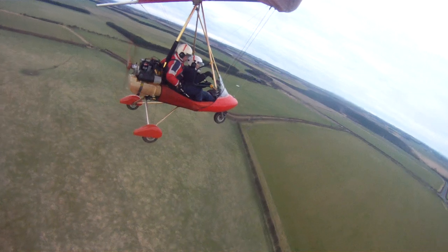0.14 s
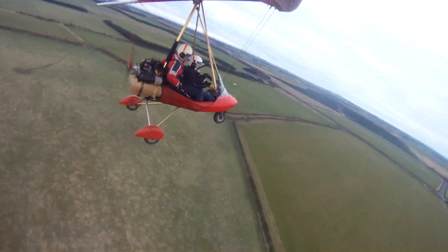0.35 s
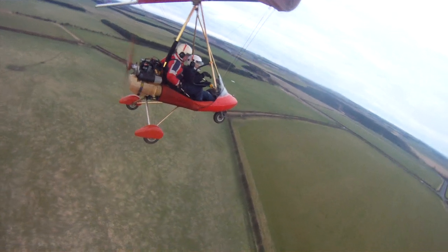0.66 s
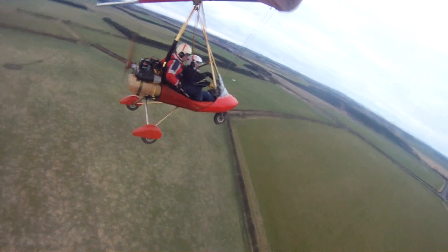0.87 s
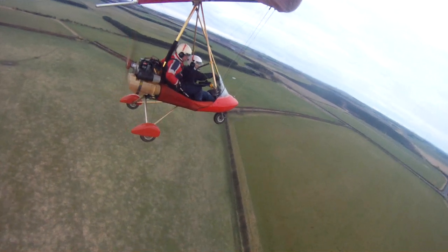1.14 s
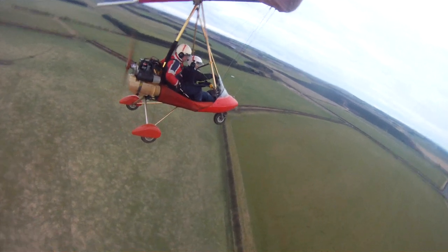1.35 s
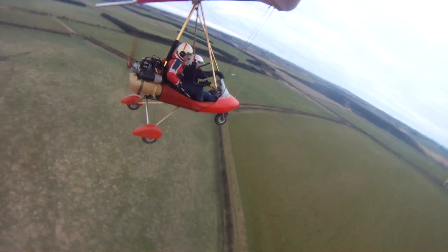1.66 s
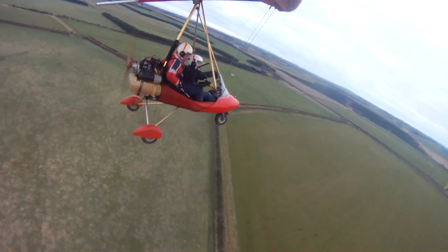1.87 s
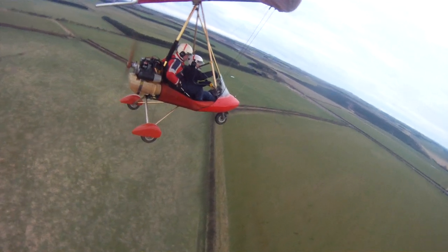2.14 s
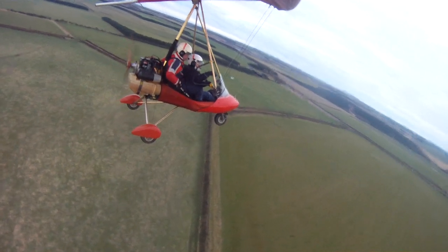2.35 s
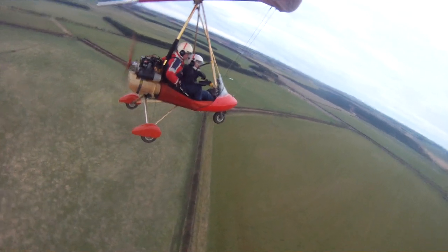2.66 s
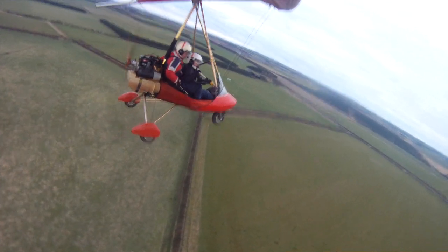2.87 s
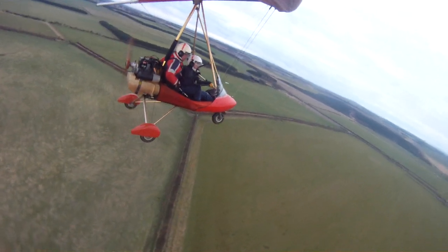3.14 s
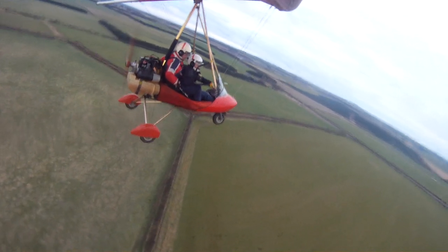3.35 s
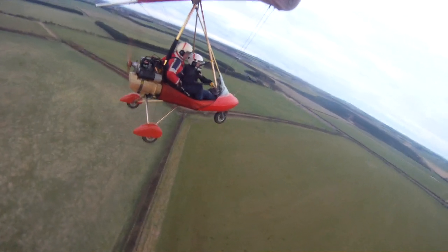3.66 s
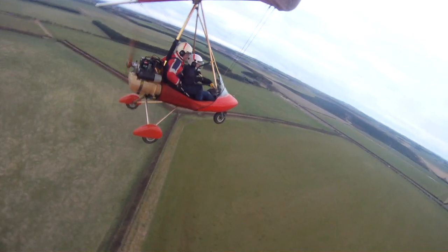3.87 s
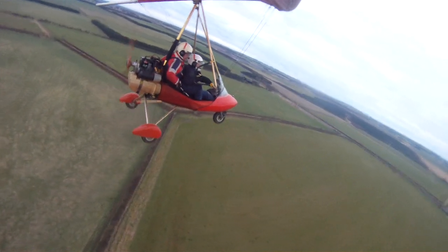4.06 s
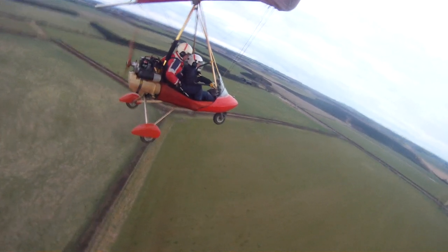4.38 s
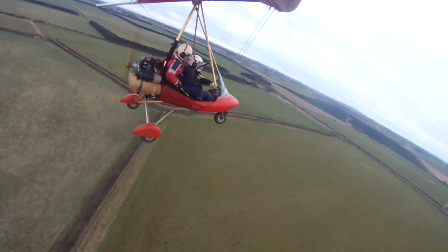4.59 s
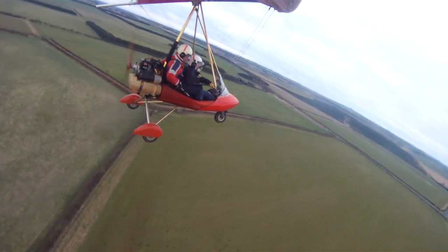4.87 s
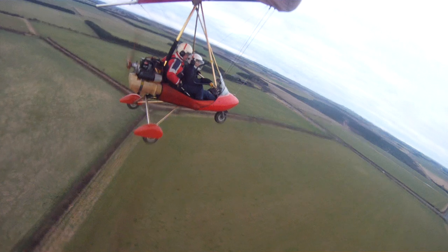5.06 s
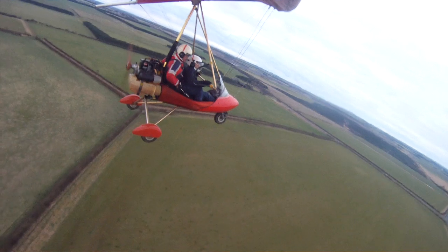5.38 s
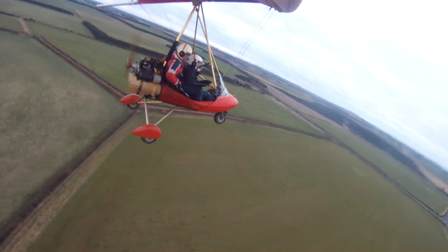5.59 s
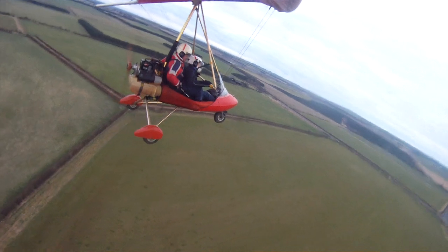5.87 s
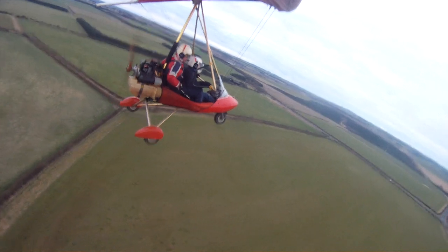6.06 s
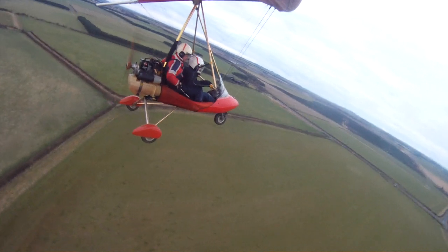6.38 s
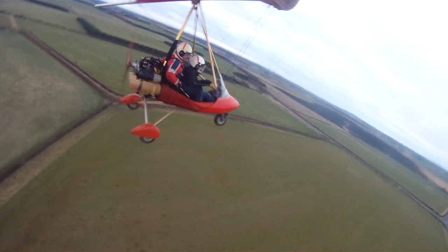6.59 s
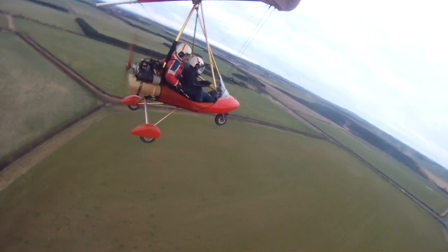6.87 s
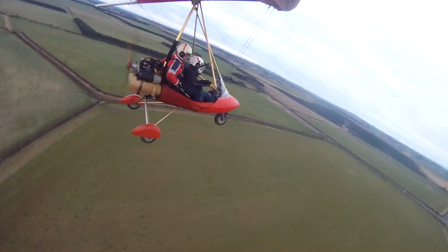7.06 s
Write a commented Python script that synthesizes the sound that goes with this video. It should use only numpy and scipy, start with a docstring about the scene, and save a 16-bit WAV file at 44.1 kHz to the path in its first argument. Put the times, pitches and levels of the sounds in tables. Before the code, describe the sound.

Gusting wind booms and rushes inside a small camera housing on a microlight's wing, with a deep throb, dull knocks and a faint engine drone.

```python
"""Air rushes and booms in quick gusts through a small closed housing clamped on a microlight's wing.
Filtered noise makes the rush, howl and hiss in the shell, and the boom and rumble in the wing tube.
The mount throbs as two low swings beat together; it knocks as short bursts of ringing modes.
Engine and pusher propeller add faint, slightly wavering tones, and the blades flutter the air noise."""
import sys
import numpy as np
from scipy import signal
from scipy.fft import rfft, irfft, next_fast_len
from scipy.io import wavfile
from scipy.ndimage import uniform_filter1d

SR = 44100
rng = np.random.default_rng(int(sys.argv[2]) if len(sys.argv) > 2 else 0)


def waveform_to_disk(signal):
    """Save audio, clipped to [-1, 1], as 16-bit WAV at the path in sys.argv[1]."""
    frames = np.transpose(np.atleast_2d(signal))
    scaled = np.clip(frames, -1, 1) * 32767
    samples = np.round(scaled).astype(np.int16)
    wavfile.write(sys.argv[1], SR, samples)


N = 318843
TIME = np.arange(N) / SR  # s
BINS = np.maximum(np.arange(N // 2 + 1) * SR / N, 1)  # Hz, kept above zero for the logarithm


def from_db(db):
    """Decibels to gain."""
    return 10 ** (np.asarray(db) / 20)


def rms_one(x):
    """Scale to rms 1."""
    return x / np.sqrt(np.mean(x ** 2) + 1e-20)


def drift(rate_hz, step_count=8):
    """Random wandering of rms 1, up to about rate_hz changes a second, drawn every step_count samples."""
    size = next_fast_len(N // step_count + 2)
    hz = np.arange(size // 2 + 1) * SR / (size * step_count)
    spectrum = rfft(rng.standard_normal(size)) / (1 + (hz / rate_hz) ** 2)
    slow = rms_one(irfft(spectrum, size))
    return np.interp(np.arange(N) / step_count, np.arange(size), slow)


def turning(hz):
    """Phase of something that turns at the given speed, from a random starting angle."""
    turns = np.cumsum(hz * np.ones(N)) / SR
    return 2 * np.pi * (turns + rng.random())


def below(edge_hz, order=8):
    """Share of each frequency's power that lies under a soft edge."""
    return 1 / (1 + (BINS / edge_hz) ** (2 * order))


def response(modes, floor):
    """Power response of a body: steep resonances standing on a smooth floor."""
    floor_hz, floor_db = np.transpose(floor)
    power = from_db(np.interp(np.log(BINS), np.log(floor_hz), floor_db)) ** 2
    for centre_hz, width_hz, db in modes:
        detuning = 2 * (BINS - centre_hz) / width_hz
        power = power + (from_db(db) / (1 + detuning ** 2)) ** 2
    return power


def turbulence(power, flutter_db, steady_s):
    """Fluttering air pressure heard through a body; its slow level is held near rms 1."""
    pressure = rng.standard_normal(N) * from_db(flutter_db)
    sound = irfft(rfft(pressure) * np.sqrt(power), N)
    size = max(int(steady_s * SR), 2)
    slow_power = uniform_filter1d(uniform_filter1d(sound ** 2, size), size)
    return sound / np.sqrt(slow_power + 1e-20)


def gusts():
    """Rise of rush, boom and rumble in dB: each gust swells, holds and drops away."""
    # gusts that hit the housing: start of hold_s, hold_s, rush_rise_db, boom_rise_db, rumble_rise_db
    gust_rows = [(0.034, 0.1, 3.5, 4, 2), (0.282, 0.057, 4.5, 6, 3), (0.438, 0.042, 3.5, 5, 4.5),
                 (0.584, 0.2, 3.5, 4.3, 2.3), (0.937, 0.12, 2.5, 2, 6.5), (1.26, 0.2, 4.7, 6.5, 5.5),
                 (1.63, 0.0, 5, 4, 6), (1.693, 0.15, 2.5, 1, 0), (1.915, 0.181, 4, 6.5, 1),
                 (2.198, 0.18, 5.8, 3.5, 4), (2.417, 0.17, 1.3, 5, 0.5), (2.673, 0.13, 1.3, 4.5, 0.4),
                 (2.88, 0.041, 5, 7, 5.0), (3.026, 0, 3.5, 8.5, 1.3), (3.2, 0.084, 3.5, 5.5, 0),
                 (3.395, 0.041, 5.5, 5, 6.5), (3.572, 0.042, 2.5, 7.5, 4.7), (3.696, 0.049, 3.5, 1, 3.5),
                 (3.926, 0, 3.5, 6, 5), (4.071, 0.066, 4, 6.5, 4.5), (4.278, 0.0, 3.5, 3.5, 7.5),
                 (4.398, 0.063, 3, -0.5, 4), (4.535, 0.091, 4.1, 7, 1.8), (4.713, 0.12, 4, 7, 3.4),
                 (4.978, 0.064, 3.5, 8.5, 2), (5.238, 0.006, 4, 8.5, 1), (5.368, 0.016, 3.5, 6, -2),
                 (5.629, 0.13, 5.3, 8, 2.5), (6.046, 0.11, 5.4, 4.5, 4.5), (6.337, 0.0, 3.5, 3.5, 6.5),
                 (6.45, 0.15, 5.5, 6, 3.5), (6.76, 0.06, 0.3, 0.5, 5), (6.852, 0.11, 3, 5.5, 1),
                 (7.018, 0.16, 4.4, 4, 5)]
    attack_s, release_s = 0.074, 0.031
    rise_db = np.zeros((3, N))
    for s, hold_s, *db in gust_rows:
        end_s = s + abs(hold_s)
        corners = [s - attack_s, s, end_s, end_s + release_s]
        rise_db += np.outer(db, np.interp(TIME, corners, [0, 1, 1, 0]))
    return rise_db


def beat_phase(lead_s=0):
    """Angle between the mount's two swings, lead_s ahead; at zero they add up."""
    # how fast the slower swing falls behind the faster: time_s, beat_rate_hz
    beat_curve = [(0.0, 5.03), (0.43, 3.87), (0.85, 7.09), (1.28, 5.34), (1.7, 5.66), (2.13, 5.25),
                  (2.55, 5.91), (2.98, 5.47), (3.4, 5.97), (3.83, 4.74), (4.25, 6.74), (4.68, 4.82),
                  (5.1, 5.3), (5.53, 5.47), (5.95, 5.0), (6.38, 5.56), (6.8, 5.77), (7.23, 5.84)]
    first_turns = .158
    s, rate_hz = np.transpose(beat_curve)
    rate_hz = np.interp(TIME, s, rate_hz)
    return 2 * np.pi * (first_turns + np.cumsum(rate_hz) / SR + rate_hz * lead_s)


def propeller():
    """Phase of the blade passes: two blades per turn, at a speed that wanders slightly."""
    turn_hz = 36.25
    return turning(2 * turn_hz * (1 + .002 * drift(1)))


def engine(blade_phase, blade_db=-43, waver_db=1.0):
    """Low engine orders and the blade tone, carried by the airframe as sines."""
    # engine tones: multiple of crank speed, level_db (rms, before the waver)
    engine_orders = [(.25, -30), (.5, -28.5), (2, -38.5), (2.25, -31.5)]
    crank_hz = 83.2
    crank = turning(crank_hz * (1 + .0015 * drift(1)))
    tones = from_db(blade_db) * np.sin(blade_phase)
    for order, db in engine_orders:
        tones = tones + from_db(db + waver_db * drift(1)) * np.sin(order * crank)
    return np.sqrt(2) * tones  # a sine's rms to its peak


def shake(unrest_hz=1.55, unrest_db=2.26):
    """The mount's two uneven swings on the wing tube beat against each other: a deep throb."""
    swing_hz = 34.7  # mean rate of the faster swing
    fast_db, slow_db = -20.5, -25  # rms, before the unrest
    fast_phase = turning(swing_hz + unrest_hz * drift(16))
    slow_phase = fast_phase - beat_phase()
    fast = from_db(fast_db + unrest_db * drift(16)) * np.sin(fast_phase)
    slow = from_db(slow_db + unrest_db * drift(16)) * np.sin(slow_phase)
    return np.sqrt(2) * (fast + slow)


def hard_knocks():
    """Timed heavy contacts in the mount."""
    # blows before the overall knock trim and mode levels: start_s, level_db
    blow_rows = [(0.0841, -15), (0.123, -18), (0.3202, -19), (0.5342, -20), (0.567, -15), (0.6424, -17),
                 (0.7521, -17), (0.8999, -19), (1.466, -18), (1.6326, -15), (1.6969, -20), (1.7539, -17),
                 (1.7993, -18), (1.9613, -14), (2.0546, -16), (2.096, -19), (2.2168, -16), (2.7401, -19),
                 (2.9032, -14), (4.5255, -18), (4.7241, -16), (4.7939, -14), (5.2993, -17), (5.626, -18),
                 (6.0495, -16), (6.0831, -17), (6.1533, -15), (6.318, -17), (6.952, -15), (7.0922, -12),
                 (7.167, -15)]
    return blow_rows


def taps(rise_db):
    """Light blows at random moments, harder in gusts: rows of start_s, level_db before the knock trim."""
    taps_per_s, between_gusts_db, spread_db = 2.0, -27, 1.0
    happens = rng.random(N) < taps_per_s / SR
    level_db = between_gusts_db + rise_db + spread_db * rng.standard_normal(N)
    return np.column_stack([TIME[happens], level_db[happens]])


def knocks(blows, trim_db=-3.2, scatter_db=2.0):
    """Soft contacts in the mount: each mode swells for a few cycles and dies."""
    # what a knock rings with: pitch_hz, width_hz (wider dies sooner), level_db (relative)
    knock_modes = [(720, 120, -14), (1100, 140, -6), (1240, 130, 0), (1620, 200, -11)]
    out = np.zeros(N + SR)
    t = TIME[:SR // 20]
    hz, width_hz, mode_db = np.transpose(knock_modes)[:, :, None]
    age = np.pi * width_hz * t
    swell = age * np.exp(1 - age)  # peaks at 1
    for s, db in blows:
        strength = from_db(db + trim_db + mode_db + scatter_db * rng.standard_normal(hz.shape))
        rings = strength * swell * np.sin(2 * np.pi * (hz * t + rng.random(hz.shape)))
        start = max(int(s * SR), 0)
        out[start:start + len(t)] += rings.sum(axis=0)
    return out[:N]


def buffeting(boom_rise_db, rumble_rise_db, boom_unrest_db=1.5, rumble_unrest_db=1.16):
    """Large eddies push on the wing tube and its clamp: noise through the frame's resonances."""
    # wing tube and clamp: pitch_hz, width_hz, level_db (relative)
    frame_modes = [(99.3, 24, 11.5), (140, 32, 4.5), (188, 20, 2.5), (213.3, 32, 4.5), (239.9, 18, 10.5)]
    # between those resonances: pitch_hz, density_db (relative, per Hz)
    frame_floor = [(20, -6), (44, 12.5), (60, 7.5), (80, -1.5), (130, -1), (200, 4), (260, -35), (290, -47),
                   (330, -30), (450, -24), (900, -88)]
    boom_base_db, rumble_base_db = -27, -25  # between gusts
    pulse_db, lead_s = 1.0, 0.045  # the boom pulses with the beat, peaking ahead of the throb
    frame = response(frame_modes, frame_floor)
    low = below(169.5)
    rumble_db = rumble_base_db + rumble_rise_db + rumble_unrest_db * drift(12)
    boom_db = boom_base_db + boom_rise_db + boom_unrest_db * drift(17.6)
    boom_db = boom_db + pulse_db * np.cos(beat_phase(lead_s))
    rumble = from_db(rumble_db) * turbulence(frame * low, 0, steady_s=0.23)
    boom = from_db(boom_db) * turbulence(frame * (1 - low), 0, steady_s=0.12)
    return rumble + boom


def clamp_chatter(depth_db=3.0):
    """The loose clamp makes contact at a nearly steady rate: level pulses in dB for the howl."""
    chatter_hz = 30.4
    contact = np.maximum(np.sin(turning(chatter_hz + drift(4.3))), 0) ** 2
    return depth_db * contact


def slipstream(blade_phase, rise_db, howl_follows=0.94, hiss_db=0.2, eddy_db=0.66, grain_db=1.1,
               chop_db=0.72, howl_flutter_db=1.06, rush_flutter_db=0.38, hiss_flutter_db=0.6):
    """Small eddies, chopped by the propeller, excite the shell: low howl, middle rush and high hiss."""
    # air and walls of the shell: pitch_hz, width_hz, level_db (relative)
    shell_modes = [(672, 50, -6.3), (742, 119, -7.8), (850, 54, -10.3), (988, 96, -13.6), (1081, 74, -7.2),
                   (1172, 147, -7.3), (1240, 102, -5.4), (1486, 24, -11.7), (1601, 187, -7.8),
                   (1668, 65, -9.1), (1868, 62, -11.6), (1928, 45, -11.8), (2084, 230, -9.6),
                   (2141, 27, -5.0), (2224, 82, -11.0), (2570, 256, -15.5), (2719, 314, -15.4),
                   (2903, 27, -15.9), (3174, 179, -24.9), (3450, 510, -20.7), (4610, 181, -30.1),
                   (4894, 305, -28.7), (5265, 203, -32.5), (7123, 723, -32.9), (8544, 703, -29.0),
                   (9334, 400, -24.3), (9871, 501, -20.6), (10380, 206, -22.5), (10819, 267, -23.9),
                   (11245, 183, -30.2)]
    # narrow whistles at the shell's seams: pitch_hz, width_hz, level_db (relative)
    whistles = [(9095, 40, -28), (9857, 35, -21), (11760, 70, -25)]
    # between those resonances: pitch_hz, density_db (relative, per Hz)
    shell_floor = [(300, -11.5), (400, -21.5), (550, -16.5), (610, -25.5), (800, -14.5), (1400, -20),
                   (2300, -12), (3000, -43), (3900, -35), (5500, -35.5), (6000, -44.5), (6500, -36),
                   (9000, -48), (11600, -37.5)]
    rush_base_db, howl_base_db = -32.5, -32.5  # between gusts
    pulse_db, lead_s = 1.0, 0.061  # the air noise pulses with the beat, peaking ahead of the throb
    shell = response([*shell_modes, *whistles], shell_floor)
    shell = shell * (1 - below(300)) * below(14000, order=60)
    low, high = below(1520), 1 - below(4080)
    gust_db = rise_db + pulse_db * np.cos(beat_phase(lead_s))
    flutter_db = eddy_db * drift(25) + grain_db * drift(440) + chop_db * np.sin(blade_phase)

    howl_flutter = flutter_db + clamp_chatter() + howl_flutter_db * drift(79)
    howl = turbulence(shell * low, howl_flutter, steady_s=0.099)
    rush_flutter = flutter_db + rush_flutter_db * drift(40)
    rush = turbulence(shell * (1 - low) * (1 - high), rush_flutter, steady_s=0.068)
    hiss_flutter = flutter_db + hiss_flutter_db * drift(60)
    hiss = turbulence(shell * high, hiss_flutter, steady_s=0.07)

    # the hiss is set against the rush by how much treble power the shell passes
    hiss_share = np.sqrt(np.sum(shell * high) / np.sum(shell * (1 - low))) * from_db(hiss_db)
    howl_gain = from_db(howl_base_db + howl_follows * gust_db)
    rush_gain = from_db(rush_base_db + gust_db)
    return howl_gain * howl + rush_gain * (rush + hiss_share * hiss)


def scene():
    """Everything reaches the one microphone inside the shell, so both channels are equal."""
    blade_phase = propeller()
    rush_db, boom_db, rumble_db = gusts()
    sound = engine(blade_phase) + shake()
    sound = sound + knocks([*hard_knocks(), *taps(rush_db)])
    sound = sound + buffeting(boom_db, rumble_db)
    sound = sound + slipstream(blade_phase, rush_db)
    return np.array([sound, sound])


def record(dry, image_db=-2.5):
    """The recorder's low sample rate mirrors the treble upward as a fizz; the top is cut."""
    mirror_hz, cutoff_hz = 12000, 15300
    # conjugating turns each pitch f into -f; the shift by twice the mirror lands it at 2 * mirror - f
    shift = np.exp(4j * np.pi * mirror_hz * TIME)
    image = np.real(np.conj(signal.hilbert(dry)) * shift)
    fizz = irfft(rfft(image) * (BINS > mirror_hz), N)
    return irfft(rfft(dry + from_db(image_db) * fizz) * (BINS < cutoff_hz), N)


dry = scene()
out = record(dry)
waveform_to_disk(out)
```